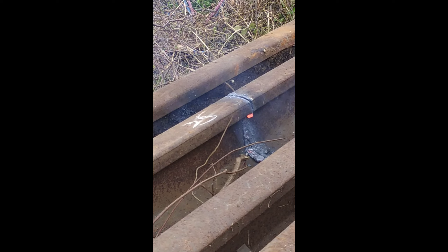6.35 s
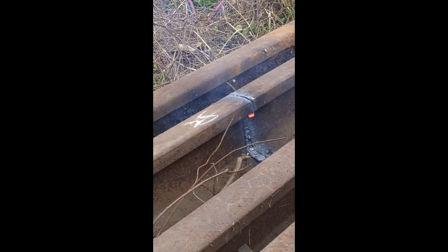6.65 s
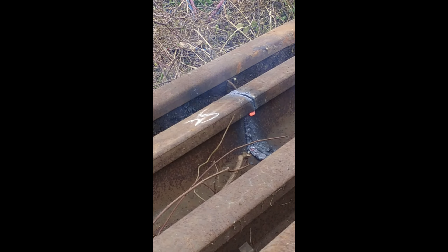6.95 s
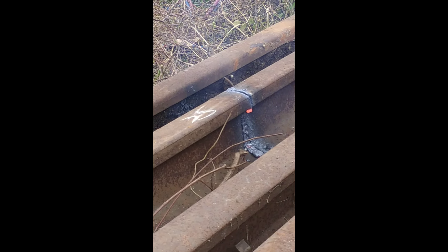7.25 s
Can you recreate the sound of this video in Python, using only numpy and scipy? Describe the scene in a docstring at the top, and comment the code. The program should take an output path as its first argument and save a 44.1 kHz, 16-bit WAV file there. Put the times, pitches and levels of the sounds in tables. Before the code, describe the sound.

Close by, a cutting torch hisses, rasps and pops on a steel rail until its jet shuts off, leaving a quieter hissing flame.

```python
"""A gas torch cuts a steel rail outdoors, a step away. Its oxygen jet hisses and crackles, sparks fizz,
the cut rasps, and the gas roars in surges as it blows through slag. The jet swings rightward and is shut
off; the softer heating flame hisses on. Slag and flame pop throughout. Rails and ground add close echoes,
and a light draught buffets the microphone during the cut."""
import sys
import numpy as np
from scipy import signal
from scipy.fft import rfft, irfft, next_fast_len
from scipy.io import wavfile
from scipy.ndimage import uniform_filter1d, map_coordinates

SR = 44100
rng = np.random.default_rng(int(sys.argv[2]) if len(sys.argv) > 2 else 0)


def wav_record(signal):
    """Record a signal, one row per channel, as 16-bit PCM in the file named by sys.argv[1]."""
    frames = np.transpose(np.atleast_2d(signal))
    bounded = np.clip(frames, -1, 1)
    # unit amplitude maps onto the largest positive 16-bit level
    quanta = np.round(bounded * 32767).astype(np.int16)
    wavfile.write(sys.argv[1], SR, quanta)


N = 321489
TIME_S = np.arange(N) / SR

# Levels are relative; each source adds its own trim.
# torch aim (time [s], left port lag [ms], roar left-right [dB], hiss left-right [dB])
AIM = [(0, 0.02, 16, -5), (2.0, 0.011, 13, -1.5), (3.15, 0, 18, -4), (3.5, 0.057, 11.5, -8.5),
       (3.8, 0.072, -1, -1.5), (4.3, 0.11, 2.5, -1.5), (4.5, 0.16, 6, -1), (5.1, 0.13, 0, -0.5),
       (5.7, 0.074, 0, 0.5), (6.4, 0.1, 0, -1), (7.29, 0.078, 0, -1.5)]
# oxygen jet hiss (time [s], level [dB])
JET_LEVEL = [(0, -13.5), (0.5, -12.5), (0.9, -14), (2.1, -14), (2.85, -13.5), (3.25, -12.5), (3.45, -14.5),
             (3.7, -14), (4.3, -16)]
# jet falters (centre [s], length [s], hiss change [dB], roar and rasp change [dB])
FALTERS = [(1.524, 0.1, -1.5, -1.5), (2.55, 0.17, -4, 4), (3.82, 0.088, -5.5, -5), (4.294, 0.07, -2, -1)]
# rail reflections (left delay [ms], left gain, right delay [ms], right gain)
RAIL_ECHOES = [(2.2, -0.077, 1.81, -0.13), (0.805, -0.0068, 1.73, 0.26)]
# reflection of the jet sweeping along the rail (time [s], delay [ms], gain)
SWEEP_ECHO = [(3.35, 0.39, -0.0079), (3.6, 0.63, -0.22), (3.92, 1.0, -0.37), (4.15, 1.05, -0.29),
              (4.32, 1.33, -0.37)]
# spark flares (peak [s], length [s], level [dB])
FLARES = [(0.202, 0.15, -33), (1.42, 0.12, -30), (2.3, 0.16, -25), (2.72, 0.27, -28), (3.245, 0.06, -22),
          (3.55, 0.33, -20.5)]
# slag in the jet's path, thinning then building up (time [s], roar [dB], rasp [dB])
SLAG = [(0, -37, -25.5), (0.7, -32.5, -25), (1.35, -34, -22.5), (1.9, -46, -24.5), (2.62, -45.5, -29.5),
        (2.95, -29, -30.5), (3.24, -43, -19), (3.42, -31, -28), (3.52, -24.5, -26), (4.05, -27, -22),
        (4.3, -29, -26)]
# jet blowing through slag lumps (peak [s], length [s], roar [dB], rasp [dB])
SURGES = [(0.338, 0.12, -29, -47), (0.533, 0.099, -30.5, -33), (1.326, 0.15, -30.5, -23),
          (1.55, 0.22, -50, -28), (1.685, 0.093, -34.5, -40), (2.282, 0.076, -29, -39),
          (3.04, 0.15, -31, -32), (3.206, 0.074, -50, -21), (3.33, 0.17, -30, -32)]
# draught gusts (peak [s], length [s], level [dB])
GUSTS = [(0.0, 0.055, -26), (0.142, 0.13, -42), (0.317, 0.036, -35), (0.465, 0.18, -33), (0.58, 0.071, -34),
         (1.053, 0.077, -31.5), (1.32, 0.07, -27), (1.4, 0.13, -33), (1.715, 0.1, -30.5),
         (2.117, 0.032, -29), (2.324, 0.05, -30), (2.539, 0.054, -27), (2.72, 0.11, -30),
         (2.93, 0.036, -31), (3.04, 0.06, -24.5), (3.17, 0.11, -28), (3.36, 0.082, -37), (3.776, 0.04, -30)]
# slag and flame pops (time [s], thump [dB], crack [dB], left-right [dB])
POPS = [(0.335, -15, -30, 10), (0.505, -14, -28, 11), (1.328, -11, -24, 1), (1.696, -14, -28, 7),
        (2.104, -12.5, -17, 6), (2.283, -12, -26, 12), (3.065, -13, -28, 17), (3.152, -15, -30, 7),
        (3.754, -12.5, -13, -22), (4.065, -18, -6, 2), (4.963, -17.5, -40, -3), (5.429, -22, -12.5, 4),
        (5.546, -13, -30, -2), (5.850, -13.5, -25, -2), (5.9958, -17, -31, -3), (6.259, -17, -29, -3),
        (6.685, -12, -32, -2), (6.792, -15.5, -38, -2), (6.907, -17, -9, -1)]
# modes a pop rings between the rails (frequency [Hz], t60 [s], level [dB])
POP_MODES = [(166, 0.075, -5), (237, 0.034, -1), (400, 0.013, -5), (590, 0.022, -5), (970, 0.014, -9)]
# heating flame (time [s], hiss [dB], nozzle sizzle [dB])
FLAME_LEVELS = [(4.37, -22, -40), (4.55, -22, -32.5), (4.98, -21.5, -33), (5.15, -23, -42),
                (5.45, -22, -40), (6.25, -23, -41), (6.7, -23, -30), (7.27, -22.5, -36)]
# flame spectrum (frequency [Hz], left density [dB], right density [dB])
FLAME_SPECTRUM = [(30, -6, -8), (110, -11.5, -10.5), (222, -2, -3.5), (400, -6.5, -3.5), (610, -2, -3),
                  (1010, -3.5, 2.8), (1280, 3, 3), (1720, -3, 1), (1980, 4, 6), (2450, 5.5, 4),
                  (2870, 2, 1), (3340, -2, -5.7), (4320, -0.5, -1), (5240, -2, 0.5), (6530, -1.5, 1.5),
                  (8620, -4.5, -4.5), (10300, -14, -18), (12500, -22, -17), (15500, -17, -17.5)]
# response of the hollow between the rails at ratio 1, per port (frequency [Hz], gain [dB])
HOLLOW_LEFT = [(610, 1.5), (781, -11), (951, 0.5), (1270, -6), (1380, -0.5), (1570, -6), (1750, -1.5),
               (2120, 1.5), (2400, 0.5), (2650, -3), (3000, -4.5), (3250, -0.5), (3650, 1), (4000, -7.5),
               (4400, 2.5)]
HOLLOW_RIGHT = [(500, 2), (681, -9.5), (831, -1), (1050, -3), (1180, -8.5), (1380, -2.5), (1500, -5),
                (1720, 0), (2020, 2), (2420, -1.5), (2650, 0), (2990, 6.5), (3250, 7), (3600, -3),
                (3950, 2.5), (4200, -7), (4400, 1.5)]
# climb of its resonances (time [s], left frequency ratio, right frequency ratio)
HOLLOW_CLIMB = [(4.4, 0.94, 1.03), (5.0, 0.98, 0.96), (5.5, 1.21, 1.11), (6.0, 1.2, 1.26),
                (6.6, 1.26, 1.39), (7.29, 1.2, 1.34)]
# source spectra (frequency [Hz], density [dB])
JET_SPECTRUM = [(60, -42), (200, -6.5), (430, -14.5), (900, -7), (1280, -6), (1700, -10.5), (2550, -6.5),
                (3600, -7), (5000, -3), (5800, -0.5), (7500, 0.5), (9200, -3), (10500, -14.5), (12500, -28),
                (15500, -34)]
CRACKLE_SPECTRUM = [(500, -7), (1500, -2), (3000, -1), (4500, -4), (6000, 1), (8000, -24), (11000, -15),
                    (15000, -20)]
FIZZ_SPECTRUM = [(3000, -34), (8000, -3.5), (11000, 6.5), (13000, 5), (15500, 4)]
RASP_SPECTRUM = [(900, -21.5), (1270, -5.5), (1700, -6), (2150, -3.5), (2500, 2.5), (2720, -2.5),
                 (2950, 3.5), (3400, -19), (5000, -37)]
CUT_ROAR_SPECTRUM = [(50, -4), (120, -9.5), (190, 0), (450, -2), (900, -1), (1600, -1.5), (2800, -2.5),
                     (3800, -9), (8000, -5.5), (15000, -61)]
OPEN_ROAR_SPECTRUM = [(50, -8), (120, -12), (190, 2), (310, -6), (470, 5.5), (950, 3), (1600, 4),
                      (2800, -5), (3800, -1), (8000, -34), (15000, -17)]
DRAUGHT_SPECTRUM = [(5, -7), (15, 10), (26, -0.5), (50, -12), (100, -18), (200, -25.5), (600, -64)]
CRACK_SPECTRUM = [(200, -15), (600, -17), (1500, 13), (2500, 11.5), (7000, 7), (10000, 4), (15000, -13)]
RUSH_SPECTRUM = [(30, -15), (80, -8), (170, -1), (330, -3), (700, -3), (1200, -11), (2500, -40)]
# treble ring of the left microphone port (frequency [Hz], gain [dB])
LEFT_PORT = [(1500, 1.5), (2600, 1.5), (4300, -1), (6200, 0.5), (7200, 1.5), (8100, 9.5), (8600, 13.5),
             (9050, 14.5), (9550, 9), (10500, 6.5), (12000, 6), (15000, 4.5)]


def undb(db):
    """Decibels to gain."""
    return 10 ** (np.asarray(db) / 20)


def unit(x):
    """Scale to rms 1."""
    return x / np.sqrt(np.mean(x ** 2))


def pan(db):
    """Port gains for a left-right level difference."""
    return undb(np.array([[1], [-1]]) * db / 2)


def curves(table):
    """Table columns, interpolated linearly in time."""
    times_s, *columns = np.transpose(table)
    return [np.interp(TIME_S, times_s, column) for column in columns]


def colour(x, spectrum):
    """Filter by (frequency [Hz], gain [dB]) points."""
    hz, db = np.transpose(spectrum)
    size = next_fast_len(x.shape[-1], real=True)
    bins_hz = np.maximum(np.fft.rfftfreq(size, 1 / SR), 1)
    gain = undb(np.interp(np.log(bins_hz), np.log(hz), db))
    return irfft(rfft(x, size) * gain, size)[..., :x.shape[-1]]


def cut_filter(x, kind, hz, order=2):
    """Low- or high-pass."""
    return signal.sosfilt(signal.butter(order, hz, kind, fs=SR, output="sos"), x)


def walk(rate_hz):
    """Random wander, spread near 1."""
    steps = rng.standard_normal(N // 10)
    return np.sqrt(3 / 2) * np.interp(TIME_S * rate_hz, np.arange(len(steps)), steps)


def delay(x, ms):
    """Time-varying delay."""
    return map_coordinates(x, [np.arange(N) - ms * SR / 1000], order=3)


def swell(peak_s, length_s):
    """Bell curve of height 1."""
    return np.exp(-np.pi * ((TIME_S - peak_s) / length_s) ** 2)


def with_swells(base_db, events):
    """Level [dB] with swells (peak [s], length [s], level [dB]) added in power."""
    swell_power = sum((undb(db) * swell(s, length_s)) ** 2 for s, length_s, db in events)
    return 10 * np.log10(undb(base_db) ** 2 + swell_power)


def eddies(grain_db, flutter_db, flutter_hz):
    """Turbulence: three independent noises sharing a fine grain and a flutter."""
    bursts = rng.standard_normal((3, N)) * undb(grain_db * walk(2500))
    return bursts * undb(flutter_db * walk(flutter_hz))


def at_ports(streams, lag_ms, direct):
    """Stream 0 arrives direct, right port first; the other two are scatter off rails and ground."""
    straight = np.array([delay(streams[0], lag_ms), streams[0]])
    return np.sqrt(direct) * straight + np.sqrt(1 - direct) * streams[1:]


def cutting_levels(spark_base_db=-27.5):
    """Hiss, sparks, roar and rasp [dB] as the jet surges through slag and falters."""
    slag_roar_db, slag_rasp_db = curves(SLAG)
    hiss_falter_db = sum(db * swell(s, length_s) for s, length_s, db, _ in FALTERS)
    slag_falter_db = sum(db * swell(s, length_s) for s, length_s, _, db in FALTERS)
    hiss_db = curves(JET_LEVEL)[0] + hiss_falter_db
    spark_db = with_swells(spark_base_db, FLARES) + hiss_falter_db / 2
    roar_db = with_swells(slag_roar_db, [(s, length_s, db) for s, length_s, db, _ in SURGES])
    rasp_db = with_swells(slag_rasp_db, [(s, length_s, db) for s, length_s, _, db in SURGES])
    return hiss_db, spark_db, roar_db + slag_falter_db, rasp_db + slag_falter_db


def jet(level_db, lag_ms):
    """Oxygen jet: turbulent hiss with droplets crackling in it."""
    gas = at_ports(eddies(grain_db=-0.3, flutter_db=0.3, flutter_hz=90), lag_ms, direct=0.9)
    hiss = unit(colour(gas, JET_SPECTRUM)) + undb(-19.5) * crackle(lag_ms)
    echoed = ground_echoes(rail_echoes(hiss), gain=0.77, tremor_ms=0.072, farthest_s=0.007)
    return unit(echoed) * undb(level_db - 4)


def crackle(lag_ms, rate_hz=330, spread_db=7.5):
    """Slag droplets burst in lone clicks, mostly small."""
    bursts = rng.random(N) < rate_hz / SR
    size_db = spread_db * np.minimum(rng.exponential(size=N), 5)
    clicks = bursts * undb(size_db) * rng.choice([-1, 1], N)
    pair = np.array([delay(clicks, lag_ms), clicks])
    return unit(colour(pair, CRACKLE_SPECTRUM))


def rail_echoes(pair, tremor_ms=0.026, tremor_hz=3.2, flap_ms=0.03, flap_hz=35):
    """Reflections comb the hiss; the comb wavers with the hand and slides as the flapping jet sweeps."""
    out = pair.copy()
    for row in RAIL_ECHOES:
        for side, (ms, gain) in enumerate((row[:2], row[2:])):
            out[side] += gain * delay(pair[side], ms + tremor_ms * walk(tremor_hz))
    sweep_ms, sweep_gain = curves(SWEEP_ECHO)
    mirrored = np.array([delay(port, sweep_ms + flap_ms * walk(flap_hz)) for port in out])
    return (out + sweep_gain * mirrored) / np.sqrt(1 + sweep_gain ** 2)


def ground_echoes(pair, gain, tremor_ms, farthest_s, nearest_s=0.0015, tremor_hz=2.2, groups=3, count=10):
    """Groups of stones and sleepers reflect the treble; each group's delay wanders with hand tremor."""
    treble = cut_filter(pair, "high", hz=1700)
    out = pair.copy()
    for side in (0, 1):
        for _ in range(groups):
            signs = rng.choice([-1, 1], count)
            delays_s = rng.uniform(nearest_s, farthest_s, count)
            taps = np.zeros(SR // 20)
            taps[(SR * delays_s).astype(int)] = signs / np.sqrt(count * groups)
            echo = signal.oaconvolve(treble[side], taps)[:N]
            out[side] += gain * delay(echo, tremor_ms * walk(tremor_hz))
    return out


def sparks(level_db, lag_ms):
    """The spark spray fizzes above the hiss."""
    fizz = at_ports(eddies(grain_db=-1, flutter_db=1, flutter_hz=90), lag_ms, direct=0.058)
    return unit(colour(fizz, FIZZ_SPECTRUM)) * undb(level_db - 3.5)


def rasp(level_db, lag_ms):
    """The narrow cut resonates as gas scrapes through."""
    scrape = at_ports(eddies(grain_db=1, flutter_db=1, flutter_hz=90), lag_ms, direct=1)
    return unit(colour(scrape, RASP_SPECTRUM)) * undb(level_db - 4.5)


def roar(level_db, lag_ms, pan_db, swing_s=(3.6, 3.9)):
    """Gas sputters through molten slag; the roar loses depth as the jet swings out of the cut."""
    sputter = at_ports(eddies(grain_db=1, flutter_db=1.9, flutter_hz=120), lag_ms, direct=0.3)
    outside = np.interp(TIME_S, swing_s, [0, 1])
    in_cut = (1 - outside) * colour(sputter, CUT_ROAR_SPECTRUM)
    in_open = outside * colour(sputter, OPEN_ROAR_SPECTRUM)
    return unit(in_cut + in_open) * undb(level_db + 3.5) * pan(pan_db)


def draught(lag_ms, base_db=-43.5, window_s=0.036):
    """Draught rumbles on the microphone ports: levelled noise, shaped by gusts."""
    air = at_ports(eddies(grain_db=-1.5, flutter_db=-0.5, flutter_hz=5.4), lag_ms, direct=0.33)
    rumble = colour(air, DRAUGHT_SPECTRUM)
    running_rms = np.sqrt(uniform_filter1d(np.mean(rumble ** 2, axis=0), int(window_s * SR)))
    return rumble / running_rms * undb(with_swells(base_db, GUSTS) + 3) * pan(2)


def thump(t, sag=0.4, sag_s=0.0056, knock_db=4, knock_at_s=0.0013, knock_width_s=0.00032):
    """A pressure knock rings between the rails; the pitch sinks as the puff spreads."""
    warped_s = t + sag * sag_s * (1 - np.exp(-t / sag_s))
    detunes = 1 + 0.068 * rng.standard_normal(len(POP_MODES))
    ring = sum(undb(db - 60 * t / t60_s) * np.sin(2 * np.pi * hz * detune * warped_s)
               for (hz, t60_s, db), detune in zip(POP_MODES, detunes))
    knock = undb(knock_db) * np.exp(-((t - knock_at_s) / knock_width_s) ** 2)
    return cut_filter(ring - knock, "high", hz=165, order=4)  # high-pass: the microphone passes no deep bass


def pops(lag_ms, snap_s=0.0008, tail_s=0.023, tail_db=-14, rush_s=0.016, rush_db=-10):
    """Slag and flame pop: a thump, a low rush and a sharp crack with a scattered tail."""
    out = np.zeros((2, N + SR))
    t = TIME_S[:SR // 8]
    crack_envelope = np.exp(-t / snap_s) + undb(tail_db) * np.exp(-t / tail_s)
    rush_envelope = undb(rush_db) * np.exp(-t / rush_s)
    for at_s, thump_db, crack_db, pan_db in POPS:
        body = thump(t)
        crack = unit(colour(rng.standard_normal((2, len(t))), CRACK_SPECTRUM)) * crack_envelope
        rush = unit(colour(rng.standard_normal((2, len(t))), RUSH_SPECTRUM)) * rush_envelope
        pop = undb(thump_db - 10) * (body + rush) + undb(crack_db - 2) * crack
        start = int(at_s * SR)
        out[:, start:start + len(t)] += pop * pan(pan_db)
    return np.array([delay(out[0], lag_ms), out[1, :N]])


def flame(lag_ms, split_hz=1500):
    """Heating flame: smooth hiss and nozzle sizzle; bass mostly direct, treble mostly scattered."""
    flame_db, sizzle_db = curves(FLAME_LEVELS)
    low, high, nozzle = (at_ports(eddies(grain_db=-0.46, flutter_db=1.14, flutter_hz=54), lag_ms, direct)
                         for direct in (0.92, 0.35, 0.1))
    gas = cut_filter(low, "low", split_hz) + cut_filter(high, "high", split_hz)
    hz, *port_db = np.transpose(FLAME_SPECTRUM)
    coloured = np.array([colour(port, list(zip(hz, db))) for port, db in zip(gas, port_db)])
    hiss = unit(coloured) * undb(flame_db - 8) * pan(0.3)
    sizzle = unit(colour(nozzle, FIZZ_SPECTRUM)) * undb(sizzle_db - 8) * pan(5.2)
    return ground_echoes(hollow(hiss) + sizzle, gain=0.62, tremor_ms=0.051, farthest_s=0.005)


def hollow(pair, frame_samples=1024):
    """Resonances between the rails climb as the torch travels."""
    hz, frame_s, frames = signal.stft(pair, SR, nperseg=frame_samples)
    climb_s, *ratios = np.transpose(HOLLOW_CLIMB)
    gain_db = []
    for ratio, response in zip(ratios, (HOLLOW_LEFT, HOLLOW_RIGHT)):
        unshifted_hz = hz[:, None] / np.interp(frame_s, climb_s, ratio)
        gain_db.append(np.interp(unshifted_hz, *np.transpose(response)))
    return signal.istft(frames * undb(gain_db), SR, nperseg=frame_samples)[1][:, :N]


def scene(oxygen_off_s=4.325, valve_s=0.0034):
    """The cutting jet until the valve snaps shut, then the bare flame; pops throughout."""
    lag_ms, roar_pan_db, hiss_pan_db = curves(AIM)
    hiss_db, spark_db, roar_db, rasp_db = cutting_levels()
    oxygen = np.clip((oxygen_off_s - TIME_S) / valve_s + 0.5, 0, 1)
    hiss = oxygen * (jet(hiss_db, lag_ms) + sparks(spark_db, lag_ms)) + (1 - oxygen) * flame(lag_ms)
    cutting = rasp(rasp_db, lag_ms) + roar(roar_db, lag_ms, roar_pan_db) + draught(lag_ms)
    return hiss * pan(hiss_pan_db) + oxygen * cutting + pops(lag_ms)


def record(dry):
    """Left port ring, clipping at full scale, steep low-pass."""
    top_hz = 15650
    ports = np.clip([colour(dry[0], LEFT_PORT), dry[1]], -1, 1)
    return signal.sosfilt(signal.ellip(12, 0.1, 80, top_hz, fs=SR, output="sos"), ports)


dry = scene()
out = record(dry)
wav_record(out)
```